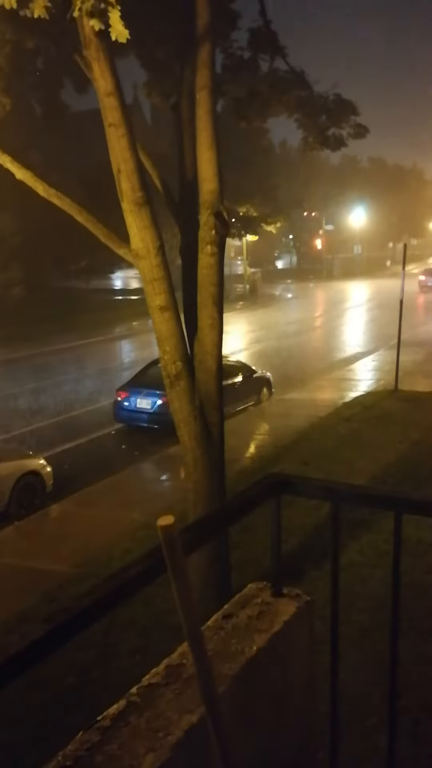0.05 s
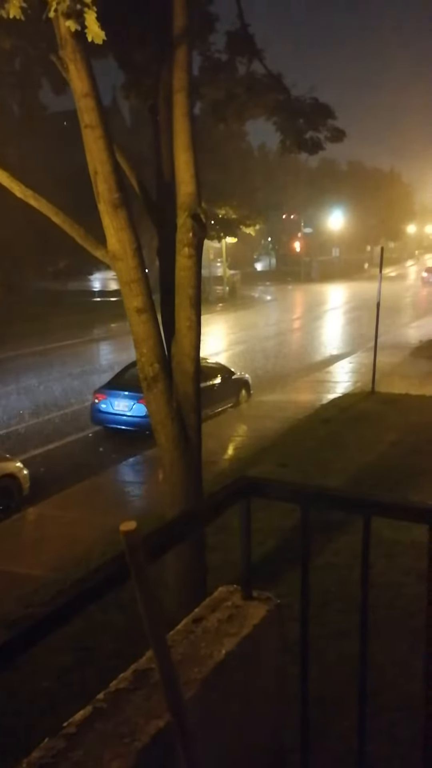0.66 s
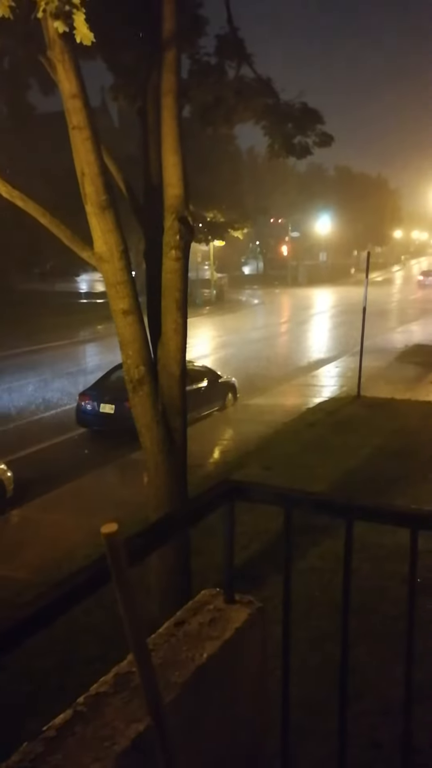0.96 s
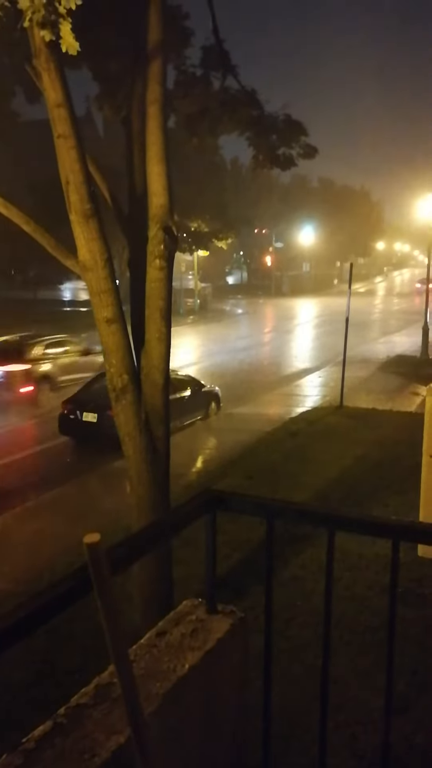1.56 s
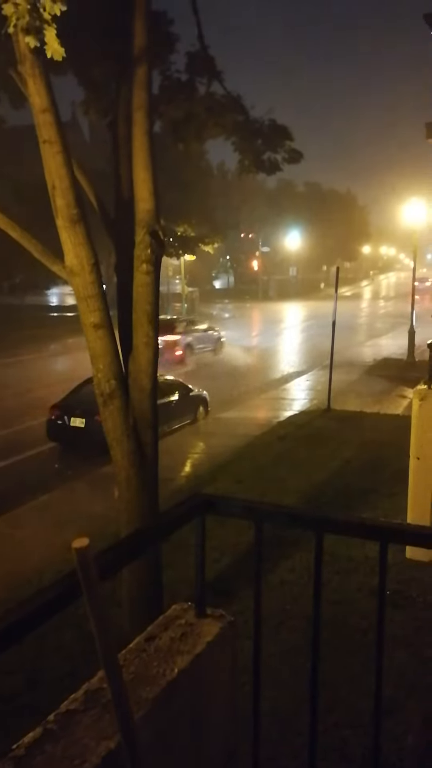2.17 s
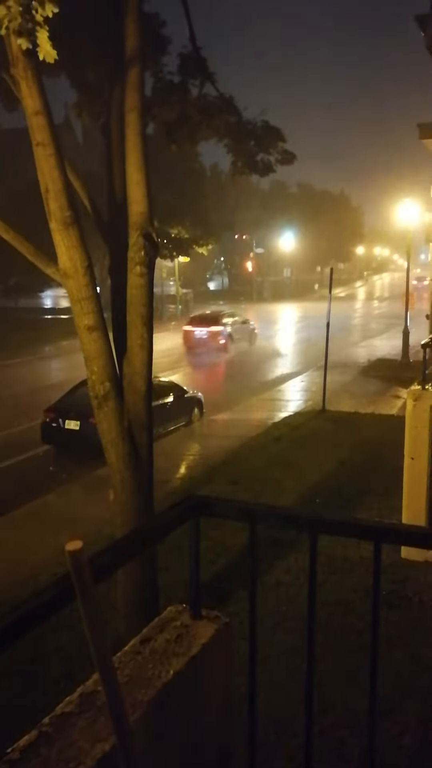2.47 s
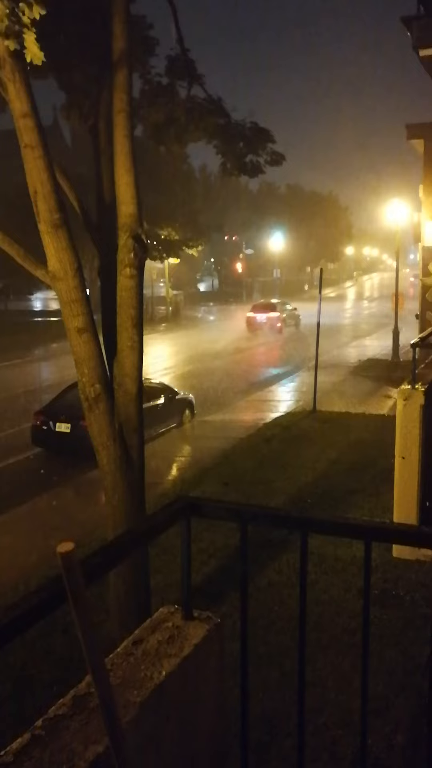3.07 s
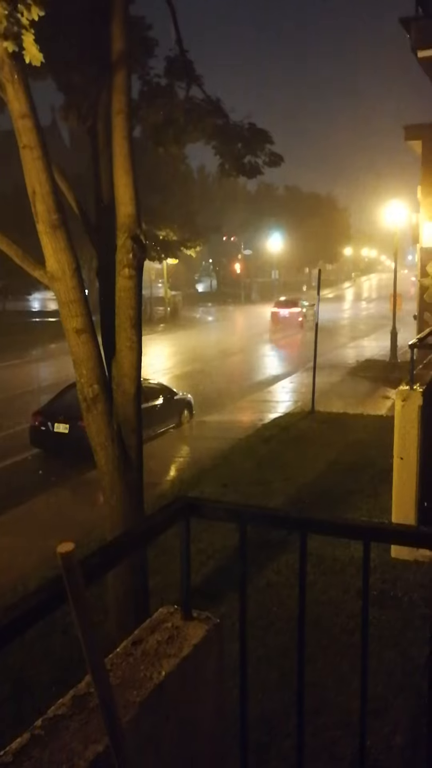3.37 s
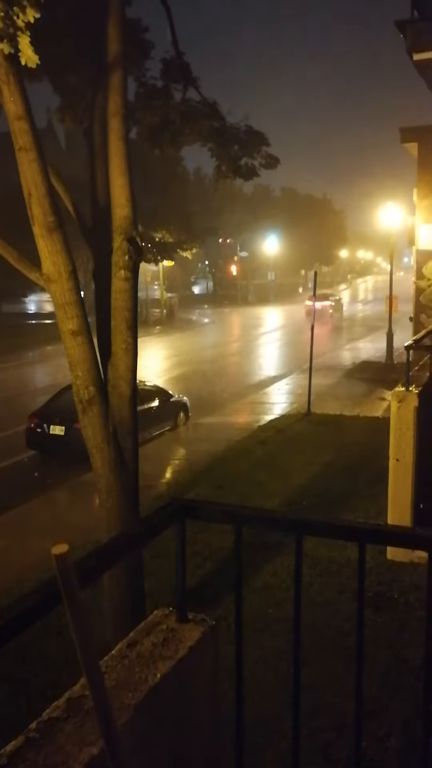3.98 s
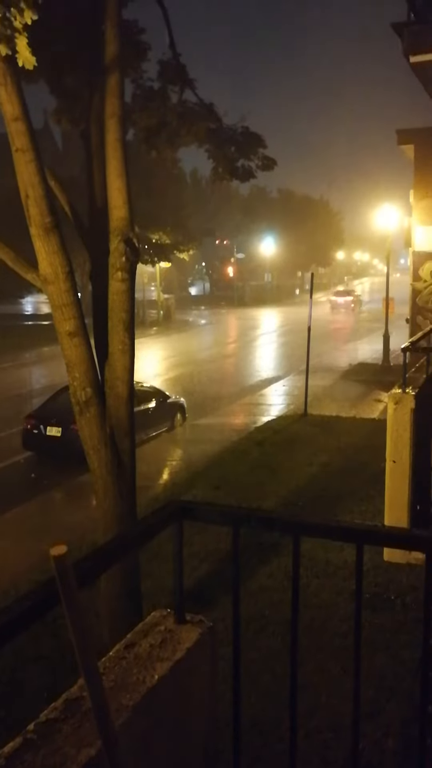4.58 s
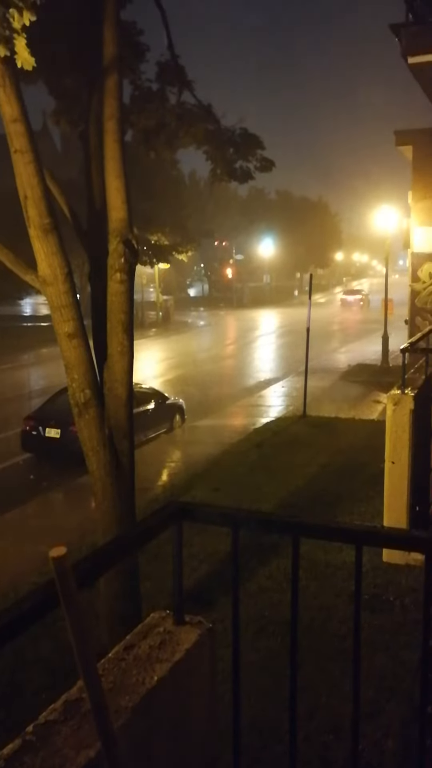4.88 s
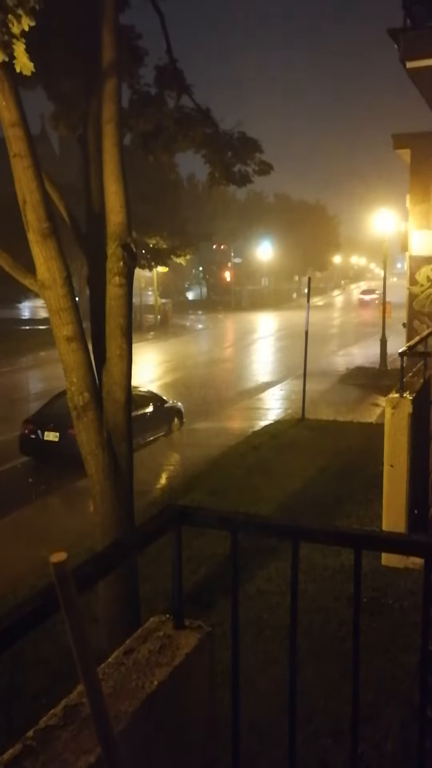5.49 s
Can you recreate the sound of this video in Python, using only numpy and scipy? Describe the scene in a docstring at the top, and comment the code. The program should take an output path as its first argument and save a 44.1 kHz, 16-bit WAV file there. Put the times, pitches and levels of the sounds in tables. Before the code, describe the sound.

Heavy rain falls on a street throughout, heard from a porch as a wide, dense hiss with fine patter. Single large drops tick sharply close by, mostly on the right, the clearest at about 0.6 and 5.4 seconds. From the start a car is passing on the flooded road, nearest at around 0.6 seconds, its tyres swishing through puddles with the biggest splash near 1.5 seconds. Its engine drones low over a road rumble, swelling at about 1.3 and 2 seconds. The rain eases very slightly around 2 seconds. At that point the tyres are heard from behind: first bright spray, then a wet roar that surges between 2.3 and 3 seconds. The roar holds until about 4 seconds and then slowly fades down the street. The steady pour continues to the end at about 5.5 seconds, with a faint rumble of distant traffic underneath.

```python
"""Heavy rain on a night street, heard from a porch: countless drops merge into a hiss, a few tick close by.
Within the first second a car passes on the flooded road, tyres swishing through puddles, engine droning low.
The rain eases a little as the car drives off, and a house wall colours the receding swish.
After about two seconds the tyres are heard from behind: spray first, then a roar that holds
and slowly fades down the street under the steady pour."""
import sys
import numpy as np
from scipy import signal
from scipy.fft import rfft, irfft, next_fast_len
from scipy.io import wavfile
from scipy.ndimage import uniform_filter1d, map_coordinates

SR = 44100
rng = np.random.default_rng(int(sys.argv[2]) if len(sys.argv) > 2 else 0)


def materialize(psi):
    """Save the field psi as 16-bit PCM at rate SR to the path in sys.argv[1].

    A 1-D psi becomes a single channel; in a 2-D psi each row is a channel.
    """
    bounded = np.clip(np.atleast_2d(psi).T, -1, 1)
    quanta = np.round(bounded * 32767).astype(np.int16)
    wavfile.write(sys.argv[1], SR, quanta)


N = 244314
TOP_HZ = 15850  # band limit
TREAD_HZ = 1020  # the tyre tread sounds below this pitch


def rain():
    """Far drops merge into a wash; nearer ones patter, the nearest as bright ticks on the right."""
    # a heavy burst easing to a steady pour: time_s, level_db
    shower = [(0, -30), (.5, -30.5), (1, -30.5), (2, -32), (2.75, -32.5), (3.5, -31.5), (4.1, -32),
              (5.54, -31.5)]
    # rain on asphalt, grass and leaves: pitch_hz, density_db
    wash_spectrum = [(120, -21.5), (330, -12), (520, -9), (900, -4), (2000, -5), (3100, -1.5), (4100, -3.5),
                     (6800, -4), (8200, -0.5), (9400, -1), (10800, -7.5), (13000, -12), (15800, -18.5)]
    level_db = np.interp(clock(), *np.transpose(shower))
    wash = coloured(scattered(patchy(depth_db=1.05, channels=2)), wash_spectrum)
    drops = np.array([patter(pitch_hz=8950, spread=0.42, cycles=0.71, size_db=1.7, count=7000)
                      for side in "LR"])
    clusters = amp(0.94 * wobble(18) + 0.83 * np.array([wobble(23.76), wobble(23.97)]))
    ticks = amp([[-9], [0]]) * patter(pitch_hz=12500, spread=0.2, cycles=0.9, size_db=1.0, count=900)
    splashes = clusters * (amp(-8) * coloured(drops, wash_spectrum) + amp(-18.5) * ticks)
    sheets = amp(0.25 * wobble(16))  # the rain falls slightly unevenly
    return amp(level_db) * sheets * unit(wash + splashes)


def patter(pitch_hz, spread, cycles, size_db, count):
    """Drops land at random moments: each a tiny damped ring, a few louder than the rest."""
    t = np.arange(96) / SR
    start = rng.integers(0, N, count)
    hz = np.clip(pitch_hz * np.exp(spread * rng.standard_normal((count, 1))), 1, TOP_HZ)
    size = amp(size_db * np.minimum(rng.exponential(size=(count, 1)), 4))
    rings = size * np.sin(2 * np.pi * hz * t) * np.exp(-hz * t / cycles)
    samples = start[:, None] + np.arange(len(t))
    return unit(np.bincount(samples.ravel(), rings.ravel(), N)[:N])


def near_drops(ring_hz, t60_s):
    """Single large drops burst on hard ground with a sharp tick."""
    # drops beside the porch: start_s, peak_db, left_minus_right_db
    landings = [(.634, -14, -5), (.641, -23, 2), (1.947, -27, -8), (2.44, -23.5, -6), (2.505, -25, -9),
                (2.688, -25.5, -6), (3.191, -27, 4), (3.26, -21.5, -7), (3.647, -23, -8), (3.97, -20.5, -6),
                (4.17, -24.5, -7), (4.355, -22, -10), (4.59, -22.5, -4), (5.351, -16.5, -6),
                (5.361, -24.5, 2), (5.434, -22, -5)]
    t = np.arange(SR // 50) / SR
    tick = np.sin(2 * np.pi * ring_hz * t) * np.exp(-np.log(1000) * t / t60_s)
    tick /= np.abs(tick).max()
    out = np.zeros((2, N + SR))
    for start_s, peak_db, pan_db in landings:
        start = round(start_s * SR)
        out[:, start:start + len(t)] += amp([[peak_db + pan_db / 2], [peak_db - pan_db / 2]]) * tick
    return out[:, :N]


def tyres():
    """Wet tyres from the side, then from behind; all but their bass dips briefly."""
    # dips above 1 kHz: centre_s, half_length_s, depth_db
    dips = [(1.98, 0.13, 2.5), (5.12, 0.23, 2.5)]
    dip_db, = swells(dips)
    bass, treble = split(tyres_alongside(spray_hz=2230) + tyres_leaving(spray_hz=1980), edge_hz=1000)
    return bass + amp(-dip_db) * treble


def tyres_alongside(spray_hz):
    """The swish falls with distance; puddles throw up brighter spray, and their water damps the tread."""
    # tyre noise from the side: pitch_hz, density_db
    side_spectrum = [(200, -21), (450, -15), (750, -3.5), (1150, -1), (1450, -0.5), (2100, -1), (2500, -1),
                     (3200, -0.6), (4000, -11), (5300, -7.5), (8000, -15), (15800, -20)]
    # puddles under the tyres: centre_s, half_length_s, swell_db, splash_db
    puddles = [(.17, 0.28, 3, 1), (.78, 0.083, 2.5, 0.5), (1.14, 0.2, -0.5, 2.5), (1.48, 0.23, 3.5, 5)]
    angle, loss_db = car_path()
    puddle_db, splash_db = swells(puddles)
    level_db = -33 - 0.87 * loss_db + puddle_db
    spray_db = -3 + 2 * np.sin(angle) + splash_db  # more spray behind the car
    hiss, spray = split(off_the_wall(swish(side_spectrum, depth_db=1.77), echo=0.18), spray_hz)
    tread, body = split(hiss, TREAD_HZ)
    return amp(level_db + 0.14 * wobble(17)) * (tread * amp(-0.5 * splash_db) + body + spray * amp(spray_db))


def tyres_leaving(spray_hz):
    """As the car turns its back, spray comes first; the lower roar follows with a surge of tread noise."""
    # tyre noise from behind: pitch_hz, density_db
    rear_spectrum = [(300, -26.5), (700, -14), (930, -6.5), (1130, -1), (1400, -4.5), (2000, -3),
                     (2350, -2), (2600, -4), (3200, -2.1), (3900, -12.5), (8000, -13), (15800, -46)]
    # surges on the wet road: centre_s, half_length_s, tread_db, spray_db
    surges = [(2.3, 0.074, 2, 1.5), (2.47, 0.12, 5, 0), (2.8, 0.4, 4, 0), (4.05, 0.25, 1, -1)]
    rear = ringing(off_the_wall(swish(rear_spectrum, depth_db=1.32), echo=0.36))
    roar, spray = split(rear, spray_hz)
    tread, body = split(roar, TREAD_HZ)
    tread_db, spray_db = swells(surges)
    lower = (tread * amp(tread_db) + body) * roar_gain(start_s=2.28, fade_db_per_s=3.5)
    upper = spray * amp(spray_db) * roar_gain(start_s=2.04, fade_db_per_s=4)
    return amp(0.13 * wobble(11)) * (lower + upper)


def roar_gain(start_s, fade_db_per_s, attack_s=0.19, hold_s=1.55):
    """The roar's envelope: it builds by 3 dB, holds, then fades down the street."""
    since_s = clock() - start_s
    built = np.clip(since_s / attack_s, 0, 1)
    fading_s = np.maximum(since_s - attack_s - hold_s, 0)
    return amp(-34.5 - 3 * (1 - built) - fade_db_per_s * fading_s)


def ringing(x):
    """Narrow resonances and hollows colour the roar; rms 1."""
    # peaks and notches: pitch_hz, width_hz, lift_db
    rings = [(786, 44, 5.5), (980, 50, 3), (1070, 57, -6.5), (1117, 44, 5.5), (1333, 29, 7),
             (1500, 45, 4.5), (1716, 60, 3.5), (1870, 60, 1), (2020, 76, -3), (2365, 70, 2.5),
             (2930, 65, 2.5), (3204, 46, 4), (3500, 81, 5)]
    lift_db = lambda hz: sum(db / (1 + (2 * (hz - centre) / width) ** 2) for centre, width, db in rings)
    return unit(filtered(x, lambda hz: amp(lift_db(hz))))


def swish(spectrum, depth_db, facing_rad=1.1, max_lag_ms=0.097):
    """Tyre noise: part comes straight from the car's bearing, part is scattered by the street."""
    # power that arrives straight from the car: pitch_hz, share
    direct_share = [(400, 0.39), (800, 0.39), (1200, 0.76), (2200, 0.24), (2600, 0.47), (3300, 0.68),
                    (4000, 0.16), (5500, 0.42), (10000, .2)]
    angle, _ = car_path()
    lag_ms = max_lag_ms * np.sin(facing_rad - angle)  # between two microphones facing up the street
    half_lag = lag_ms * SR / 1000 / 2
    noise = patchy(depth_db, channels=3)
    lagged = np.array([map_coordinates(noise[0], [np.arange(N) + way * half_lag]) for way in (-1, 1)])
    direct = filtered(lagged, lambda hz: np.sqrt(along(direct_share, hz)))
    diffuse = filtered(scattered(noise[1:]), lambda hz: np.sqrt(1 - along(direct_share, hz)))
    return coloured(direct + diffuse, spectrum)


def off_the_wall(x, echo, low_hz=650, top_hz=2270):
    """Bounces between house walls comb the swish's mids; the detour shortens as the car drives on."""
    angle, _ = car_path()
    delay_ms = 5.26 + 0.14 * np.cos(angle)
    delayed = np.arange(N) - delay_ms * SR / 1000
    returned = lambda hz: echo * np.exp(-(hz / top_hz) ** 4) * hz ** 2 / (hz ** 2 + low_hz ** 2)
    bounces = [x]
    for _ in range(3):
        reflected = filtered(bounces[-1], returned)
        bounces.append(np.array([map_coordinates(side, [delayed]) for side in reflected]))
    return unit(sum(bounces))


def engine():
    """The exhaust drones at the firing rate and booms three times; its overtones fade with distance."""
    # the exhaust's rush: pitch_hz, density_db
    exhaust_spectrum = [(50, -25), (85, 3), (130, -5), (340, -19), (430, -4.5), (620, 4.5), (800, -3),
                        (1400, -40)]
    # booms of the drone: centre_s, half_length_s, swell_db
    booms = [(.6, .1, 5), (1.33, 0.31, 9.5), (2.05, 0.4, 11)]
    _, loss_db = car_path()
    boom_db, = swells(booms)
    firing_hz = 48.2 + 0.55 * clock()  # the engine speeds up gently
    phase = 2 * np.pi * np.cumsum(firing_hz * (1 + 0.00694 * wobble(11))) / SR
    drone = unit(np.sin(phase)) + amp(-1) * coloured(rng.standard_normal(N), exhaust_spectrum)
    hum = np.zeros(N)
    for order, nearest_db in enumerate([-64.5, -62, -63, -59.5], start=2):
        level_db = nearest_db - 0.91 * loss_db + 1.9 * wobble(7)
        hum += amp(level_db) * unit(np.sin(order * phase + 0.38 * wobble(12)))
    return amp(-62 + boom_db + 0.55 * wobble(9)) * drone + hum


def road_rumble():
    """The car's tyres hum on the road and recede into the steady rumble of far traffic."""
    # rolling hum of the near car: pitch_hz, density_db
    rolling_spectrum = [(20, -22), (50, -1), (100, -11), (130, -10), (155, 2.5), (190, -3), (260, 3.5),
                        (325, -11), (420, -4), (700, -27), (1500, -60)]
    # far traffic: pitch_hz, density_db
    traffic_spectrum = [(20, -15), (48, -2), (80, -3.5), (100, -3), (125, -4.5), (150, 4), (182, -3.5),
                        (205, -1), (265, 1), (325, -7), (420, -4), (700, -24), (1500, -60)]
    _, loss_db = car_path()
    rolling = amp(-49 - 1.63 * loss_db) * coloured(rng.standard_normal(N), rolling_spectrum)
    traffic = amp(-53) * coloured(rng.standard_normal(N), traffic_spectrum)
    return rolling + traffic


def car_path(pass_s=0.61, speed_m_per_s=10.9, road_m=12.4):
    """A straight, steady pass: the angle from straight across (rad) and the inverse-distance loss (dB)."""
    ahead_m = speed_m_per_s * (clock() - pass_s)
    return np.arctan2(ahead_m, road_m), 20 * np.log10(np.hypot(ahead_m, road_m) / road_m)


def scattered(pair):
    """Sound from all around: alike at both microphones in the bass, unrelated in the treble."""
    # likeness of left and right: pitch_hz, correlation
    likeness = [(200, 0.89), (350, 0.2), (520, -0.14), (750, -0.34), (1250, 0.54), (1700, 0.35),
                (2400, -0.31), (3200, 0.16), (4200, -0.1), (5200, 0.063), (9000, -0.0081)]
    turn = lambda hz: np.arccos(along(likeness, hz)) / 2
    mid, side = filtered(pair, lambda hz: np.array([np.cos(turn(hz)), np.sin(turn(hz))]))
    return np.array([mid + side, mid - side])


def patchy(depth_db, channels):
    """White noise whose strength drifts in small patches of time and frequency."""
    cells = signal.stft(rng.standard_normal((channels, N)), nperseg=512)[2]
    patches = uniform_filter1d(rng.standard_normal(cells.shape[1:]), size=6, axis=0)
    patches = uniform_filter1d(patches, size=12, axis=1)
    return unit(signal.istft(cells * amp(depth_db * unit(patches)), nperseg=512)[1][:, :N])


def swells(rows):
    """Bell-shaped swells from rows of centre_s, half_length_s, sizes: one curve per size column."""
    return sum(np.outer(sizes, np.exp(-((clock() - s) / half_s) ** 2)) for s, half_s, *sizes in rows)


def wobble(rate):
    """A smooth random curve, rate knots a second."""
    return map_coordinates(rng.standard_normal(int(N * rate / SR) + 4), [np.arange(N) * rate / SR])


def split(x, edge_hz):
    """A crossover: the parts of x below and above an edge."""
    low = filtered(x, lambda hz: 1 / (1 + (hz / edge_hz) ** 8))
    return low, x - low


def coloured(x, spectrum):
    """x shaped by a spectrum, at rms 1."""
    return unit(filtered(x, lambda hz: amp(along(spectrum, hz))))


def filtered(x, response):
    """x through a frequency response."""
    size = next_fast_len(N + SR // 2)
    return irfft(rfft(x, size) * response(np.fft.rfftfreq(size, 1 / SR)), size)[..., :N]


def along(points, hz):
    """Points of pitch_hz, value, read on a log axis."""
    pitches, values = np.transpose(points)
    return np.interp(np.log(hz + 1), np.log(pitches + 1), values)


def clock():
    """The time of every sample, in seconds."""
    return np.arange(N) / SR


def amp(db):
    """Decibels to gain."""
    return 10 ** (np.asarray(db) / 20)


def unit(x):
    """Scale to rms 1."""
    return x / np.sqrt(np.mean(x ** 2) + 1e-20)


def scene():
    """Rain all around and one passing car, with engine and rumble in the centre."""
    return tyres() + rain() + near_drops(ring_hz=9700, t60_s=0.0011) + engine() + road_rumble()


def record(dry):
    """Each microphone port adds its own colour; nothing is kept above the band limit."""
    # colour difference between the ports: pitch_hz, left_minus_right_db
    balance = [(180, 0), (400, 1.5), (560, -2), (920, -3), (1300, -0.5), (1800, 1), (2200, -1), (2650, -5),
               (3250, -5.5), (3950, -1), (5600, -4), (7900, -3.5), (9900, 0.5), (12000, -1), (15000, -4)]
    ports = lambda hz: amp(np.array([along(balance, hz), -along(balance, hz)]) / 2)
    equal_power = lambda hz: ports(hz) / np.sqrt(np.mean(ports(hz) ** 2, axis=0))
    return filtered(dry, lambda hz: equal_power(hz) * (hz < TOP_HZ))


dry = scene()
out = record(dry)
materialize(out)
```